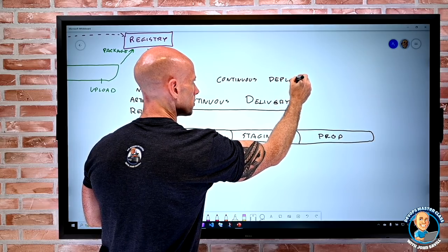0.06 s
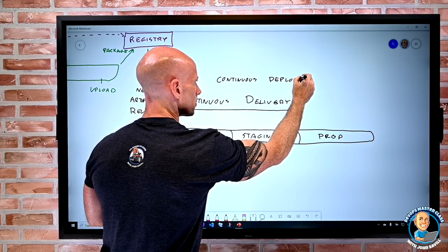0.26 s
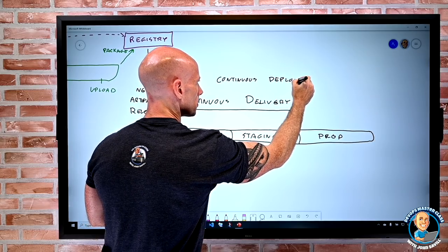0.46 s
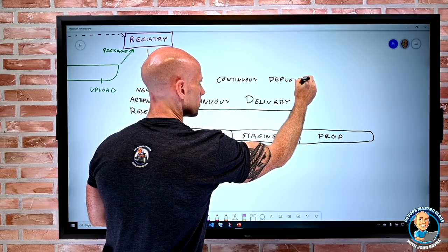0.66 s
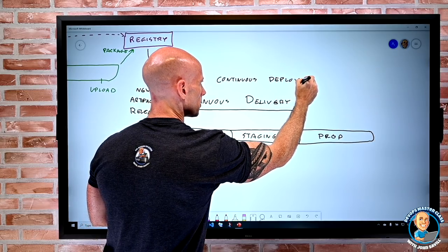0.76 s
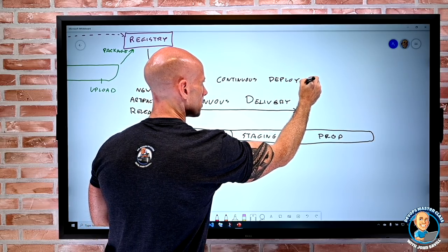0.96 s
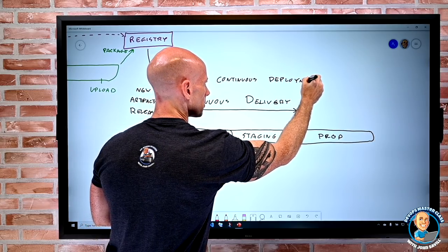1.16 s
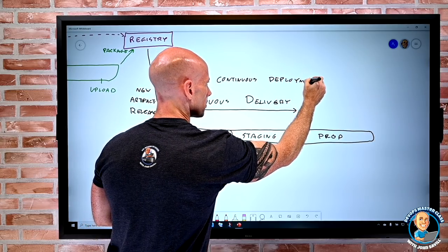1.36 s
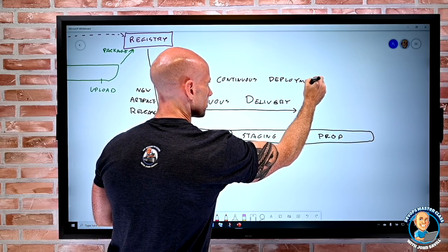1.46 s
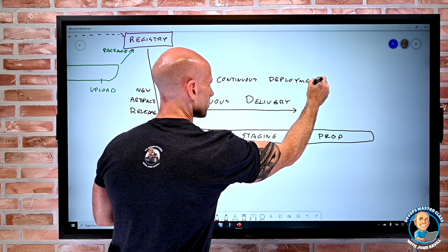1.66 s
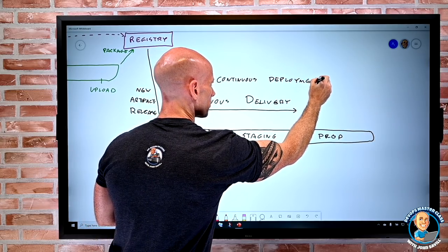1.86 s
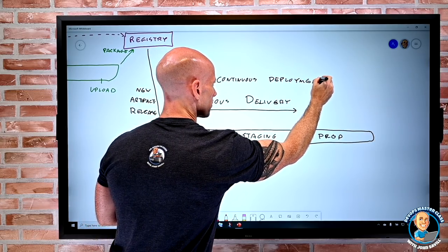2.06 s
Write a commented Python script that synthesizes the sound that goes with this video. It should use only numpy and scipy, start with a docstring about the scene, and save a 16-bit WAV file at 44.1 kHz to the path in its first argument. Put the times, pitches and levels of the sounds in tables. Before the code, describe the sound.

Sharp stylus clicks on a big wall-mounted glass panel, unevenly spaced, over faint hum and buzz.

```python
"""Quiet room air, a low hum and a thin mains buzz run throughout: coloured noise, sines and repeated spikes.
Over them a stylus writes letters with six taps on a large wall-mounted touchscreen in a small room.
Each tap is a sharp push and click on the glass, then a short hollow panel ring of fading modes
and a brief room tail of shaped noise.
Faint swells of friction noise come before the first tap, between some taps and after the last."""
import sys
import numpy as np
from scipy import signal
from scipy.fft import rfft, irfft, next_fast_len
from scipy.io import wavfile
from scipy.ndimage import uniform_filter1d

SR = 44100
rng = np.random.default_rng(int(sys.argv[2]) if len(sys.argv) > 2 else 0)


def waveform_to_disk(signal):
    """Save audio, clipped to [-1, 1], as 16-bit WAV at the path in sys.argv[1]."""
    frames = np.transpose(np.atleast_2d(signal))
    scaled = np.clip(frames, -1, 1) * 32767
    samples = np.round(scaled).astype(np.int16)
    wavfile.write(sys.argv[1], SR, samples)


N = 92610  # length in samples


def amp(db):
    """Decibels to gain."""
    return 10 ** (np.asarray(db) / 20)


def unit(x):
    """Scale to rms 1."""
    return x / np.sqrt(np.mean(x ** 2) + 1e-20)


def along(points, hz):
    """Read (pitch_hz, value) points on a log pitch axis."""
    point_hz, values = np.transpose(points)
    return np.interp(np.log(hz + 1), np.log(point_hz + 1), values)


def filtered(x, response):
    """Multiply the spectrum of x by a response of frequency, padded with silence against wrap-around."""
    size = next_fast_len(len(x) + SR // 4)
    spectrum = rfft(x, size) * response(np.fft.rfftfreq(size, 1 / SR))
    return irfft(spectrum, size)[:len(x)]


def noise(colour):
    """Steady coloured noise of rms 1."""
    return unit(filtered(rng.standard_normal(N), lambda hz: amp(along(colour, hz))))


def impulse(colour, size=2048):
    """A causal, minimum-phase pulse of energy 1 with the given colour."""
    cepstrum = irfft(np.log(amp(along(colour, np.fft.rfftfreq(size, 1 / SR)))))
    # folding the cepstrum forward puts the energy as early as possible
    cepstrum[1:size // 2] *= 2
    cepstrum[size // 2 + 1:] = 0
    pulse = irfft(np.exp(rfft(cepstrum)))
    return pulse / np.linalg.norm(pulse)


def add(track, start_s, x):
    """Mix x into the track at a time in seconds."""
    part = track[max(0, round(start_s * SR)):][:len(x)]
    part += x[:len(part)]


def taps():
    """Every tap: the snap of tip and glass with its first echoes, then panel ring and room."""
    # taps: start_s, level_db, place (0 left - 1 right), click_db, flex_hz (first flex), ring_db
    tap_list = [(.2008, 1, 0.26, -0.5, 756, -1.5), (0.5167, 0.5, 0.39, 0.5, 830, -1.5),
                (.746, 1, 0.37, -2, 830, 0), (1.1978, -1.5, 0.8, -6, 660, -1),
                (1.5313, -1, 0.81, -1, 790, -1), (1.7452, 1, 0.85, -5, 823, -2.5)]
    # colour of the hard tip: pitch_hz, level_db
    click_colour = [(300, -29), (1200, -21.5), (2300, -4.5), (2900, -10.5), (4000, 1.5), (5000, -2),
                    (6000, -15.5), (8000, -26), (15000, -40)]
    # nearby surfaces return the snap: delay_s, level_db
    echo_list = [(.0067, -11.5), (0.0088, -15.5), (0.0198, -34)]
    base_click_db = -28.5
    pattern_turn = 0.65  # radians away from the shared reflection pattern at each tap

    out, t = np.zeros(N), np.arange(SR // 2) / SR
    walls = rng.standard_normal(len(t))
    click = impulse(click_colour)
    for start_s, level_db, place, click_db, flex_hz, ring_db in tap_list:
        snap = push(t, flex_hz)
        add(snap, 0, -amp(click_db + base_click_db) * click)
        fresh = rng.standard_normal(len(t))
        pattern = np.cos(pattern_turn) * walls + np.sin(pattern_turn) * fresh
        body = amp(ring_db) * ring(t, place)
        tail = room(t, pattern, click_db)
        add(out, start_s, amp(level_db) * (snap + body + tail))
        for delay_s, echo_db in echo_list:
            add(out, start_s + delay_s, amp(level_db + echo_db) * snap)
    return bass_cut(out)


def push(t, flex_hz):
    """The glass gives way under the tip and springs back once; the heavy frame follows more slowly."""
    push_top_s, push_db = 0.00036, -25.5  # time to the top of the envelope, level
    thump_hz, thump_top_s, thump_db = 219.7, 0.002, -35.5  # the whole screen yields on its mount

    def flex(hz, top_s):
        """A sine under a swell that peaks at top_s and dies away."""
        return t / top_s * np.exp(1 - t / top_s) * np.sin(2 * np.pi * hz * t)

    return amp(thump_db) * flex(thump_hz, thump_top_s) - amp(push_db) * flex(flex_hz, push_top_s)


def ring(t, place):
    """Panel modes swell and die; their mix depends on where the tip lands."""
    # modes of the panel: pitch_hz, left_db, middle_db, right_db (by place struck), t60_s
    panel_modes = [(149, -42, -44.5, -54, 0.33), (159.8, -57.5, -42.5, -41, 0.3),
                   (196.1, -42.5, -41.5, -59, .27), (230.7, -39, -53, -40, 0.39),
                   (260.7, -46, -54.5, -47, 0.57), (331, -52, -52.5, -36.5, .22),
                   (417, -27.5, -51.5, -29.5, 0.23), (460.4, -25, -24.5, -29.5, 0.1),
                   (540.5, -39, -36.5, -38, .17), (557.6, -49, -31, -44.5, 0.2),
                   (583.4, -46, -28.5, -52, 0.092), (692, -32, -32, -36, 0.07),
                   (852, -31, -38, -25.5, 0.07), (896.4, -43, -31.5, -60, 0.097),
                   (1015.6, -55, -47.5, -50, 0.14), (1252, -52, -67, -48, 0.083),
                   (1501, -50.5, -46, -64, .07)]
    spread_s = 0.0046  # time constant of the bending filling the panel
    scatter_db = 1.73  # random change of each mode from tap to tap

    hz, left_db, middle_db, right_db, t60_s = np.transpose(panel_modes)[:, :, None]
    side_db = left_db if place < .5 else right_db
    level_db = middle_db + abs(2 * place - 1) * (side_db - middle_db)
    level_db = level_db + scatter_db * rng.standard_normal(hz.shape)
    modes = amp(level_db - 60 * t / t60_s) * np.cos(2 * np.pi * hz * t)
    swell = 1 - np.exp(-t / spread_s)
    return -swell * np.sum(modes, axis=0)


def room(t, pattern, click_db, size=512, count=31):
    """Dense reflections: the treble comes and dies first and follows the hardness of the tap."""
    # diffuse answer of casing and room: pitch_hz, level_db
    room_colour = [(40, -35), (100, -7), (145, -3), (300, 7), (520, 7), (900, -2.5), (1400, -14),
                   (2000, -19), (2900, -20), (4200, -24.5), (6000, -36), (8000, -45.5), (15000, -56.5)]
    # decay of the reverberation: pitch_hz, t60_s
    room_decay = [(150, 0.41), (500, 0.28), (800, .23), (1400, .15), (6000, 0.11)]
    # how much of the click level the tail follows: pitch_hz, share
    hardness_share = [(900, 0.27), (3000, 0.73)]
    level_db, split_hz = -14.5, 1000
    treble_rise_s, bass_rise_s = 0.00049, 0.025  # below the split the tail builds up slowly

    # each band fades at its own rate
    hz, frame_s, bands = signal.stft(pattern, SR, nperseg=size)
    decay = amp(-60 * frame_s / along(room_decay, hz)[:, None])
    tail = signal.istft(bands * decay, SR, nperseg=size)[1][:len(t)]

    # flatten the broad spectrum, then colour it
    spectrum, hz = rfft(tail), np.fft.rfftfreq(len(t), 1 / SR)
    power = uniform_filter1d(uniform_filter1d(np.abs(spectrum) ** 2, count), count)
    spectrum = spectrum / np.sqrt(np.abs(power) + 1e-12)
    spectrum = spectrum * amp(along(room_colour, hz) + click_db * along(hardness_share, hz))

    low = 1 / (1 + (hz / split_hz) ** 6)
    bass = irfft(spectrum * low) * (1 - np.exp(-(t / bass_rise_s) ** 2))
    treble = irfft(spectrum * (1 - low)) * (1 - np.exp(-t / treble_rise_s))
    fade_out = np.clip(2 - 2 * t / t[-1], 0, 1) ** 2  # over the second half
    tail = (bass + treble) * fade_out
    return amp(level_db) * tail / np.linalg.norm(tail)


def bass_cut(x, order=5, cut_hz=122):
    """Air slips round the panel at low frequencies."""
    return signal.sosfilt(signal.butter(order, cut_hz, "high", fs=SR, output="sos"), x)


def rubs():
    """Short soft swells of friction as the tip draws a stroke."""
    # tip sliding: peak_s, level_db, rise_s (Gaussian width)
    rub_list = [(.008, -67.5, 0.018), (.355, -64, .014), (.974, -59, .008), (1.398, -67, .018),
                (1.989, -66, 0.014)]
    # colour of the friction: pitch_hz, level_db
    rub_colour = [(40, -55), (100, 9), (250, -8), (450, 11), (740, 1), (950, -5), (2000, -43), (8000, -81)]
    fall_s = 0.019  # Gaussian width

    t, swells = np.arange(N) / SR, np.zeros(N)
    for peak_s, level_db, rise_s in rub_list:
        width_s = np.where(t < peak_s, rise_s, fall_s)
        swells += amp(level_db) * np.exp(-.5 * ((t - peak_s) / width_s) ** 2)
    return noise(rub_colour) * swells


def air():
    """Quiet room air: steady coloured noise."""
    # colour of the air: pitch_hz, level_db
    air_colour = [(20, -13.5), (60, -11), (100, -3), (130, -4), (200, 3.5), (400, -5.5), (750, -11),
                  (1100, -18.5), (2500, -23.5), (6000, -27.5), (9000, -32), (15500, -31)]
    return amp(-70.5) * noise(air_colour)  # rms level in dB


def hum():
    """Steady sines, each from a random phase."""
    # hum lines: pitch_hz, level_db (rms)
    hum_lines = [(59.6, -77), (179, -74), (301, -79.5), (660, -89), (780, -83.5), (900, -89)]
    t, out = np.arange(N) / SR, np.zeros(N)
    for hz, level_db in hum_lines:
        out += amp(level_db) * np.sqrt(2) * np.sin(2 * np.pi * (hz * t + rng.random()))
    return out


def buzz():
    """Spikes that alternate in sign each half mains cycle."""
    # colour of one spike: pitch_hz, level_db
    buzz_colour = [(300, -24), (800, -1.5), (1300, 6.5), (1900, 1), (2400, -5), (3000, 5.5), (3600, 3),
                   (4500, -8.5), (5600, -5.5), (8000, -10.5), (15000, -20.5)]
    # spikes in each half cycle: delay_s, level_db (relative to each other)
    spike_list = [(0, 10), (.001, -5.5)]
    mains_hz, first_s, level_db = 60.01, .0019, -80  # level is rms

    out, spike = np.zeros(N), impulse(buzz_colour)
    for k, start_s in enumerate(np.arange(first_s, N / SR, .5 / mains_hz)):
        for delay_s, spike_db in spike_list:
            add(out, start_s + delay_s, (-1) ** k * amp(spike_db) * spike)
    return amp(level_db) * unit(out)


def scene():
    """The screen and the room at one microphone."""
    return (taps() + rubs() + air() + hum() + buzz())[None]


def record(dry, top_hz=15650):
    """The recorder keeps nothing above its band limit."""
    return filtered(dry[0], lambda hz: hz < top_hz)[None]


dry = scene()
out = record(dry)
waveform_to_disk(out)
```